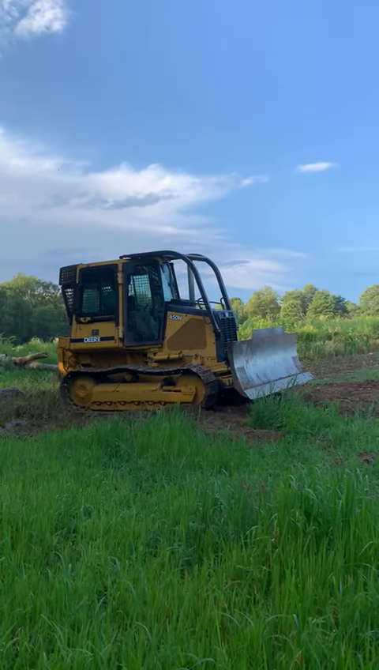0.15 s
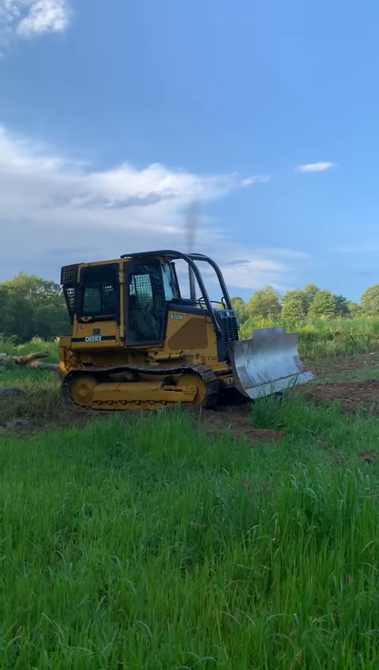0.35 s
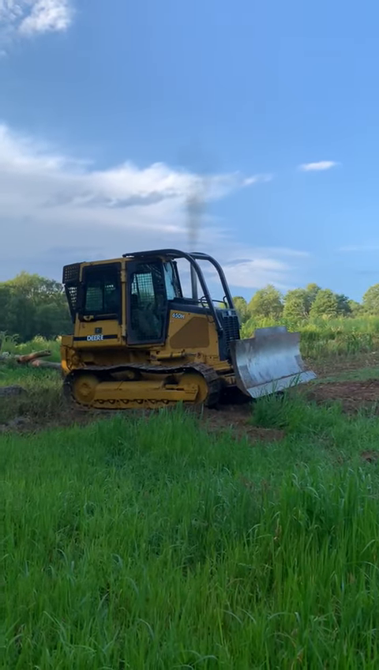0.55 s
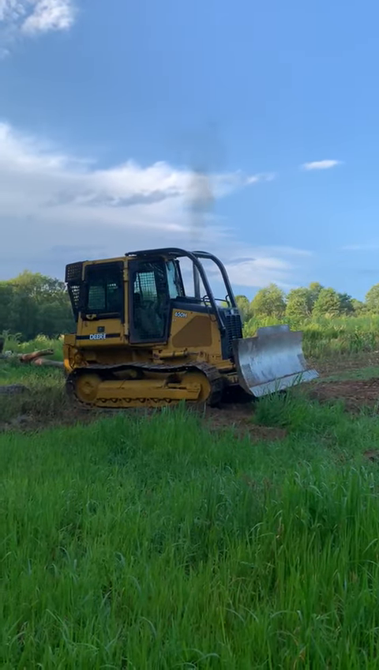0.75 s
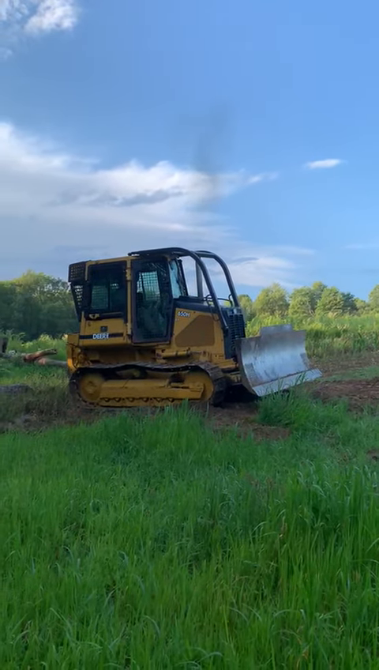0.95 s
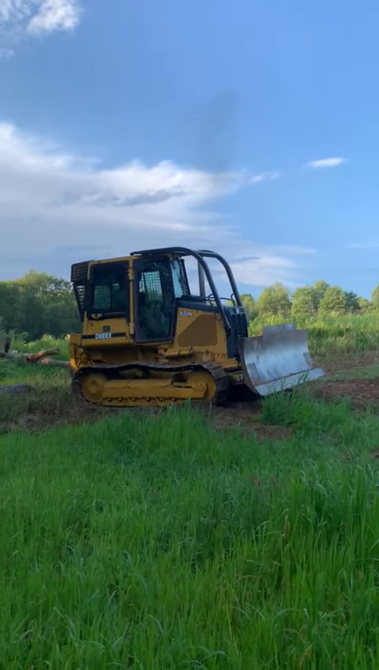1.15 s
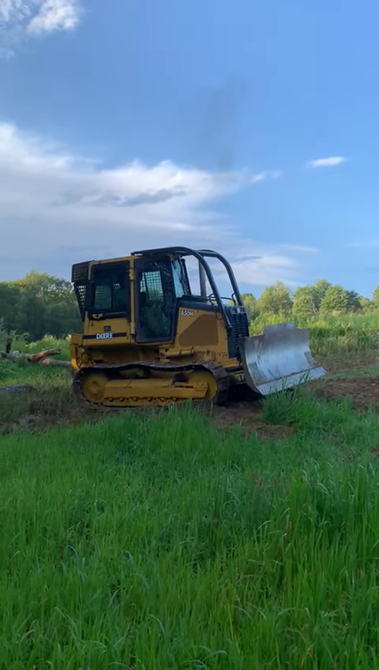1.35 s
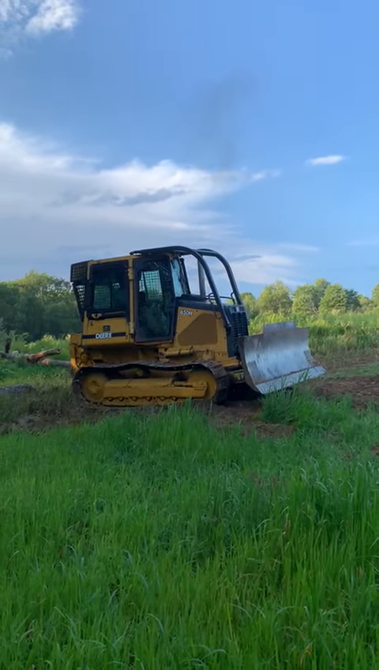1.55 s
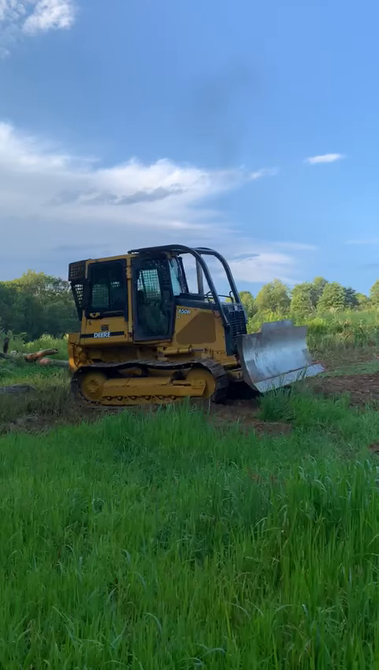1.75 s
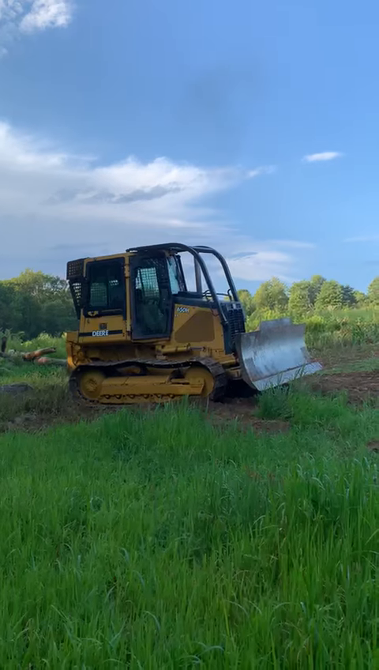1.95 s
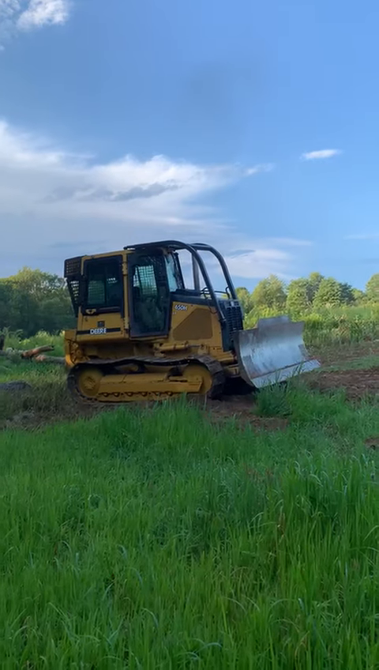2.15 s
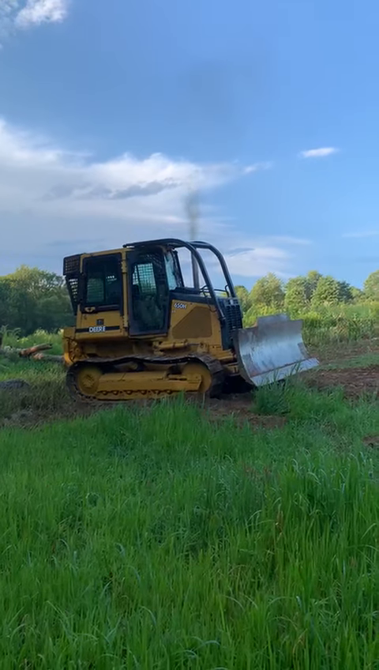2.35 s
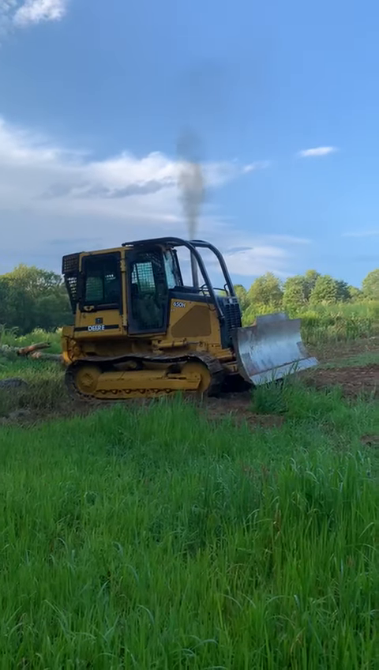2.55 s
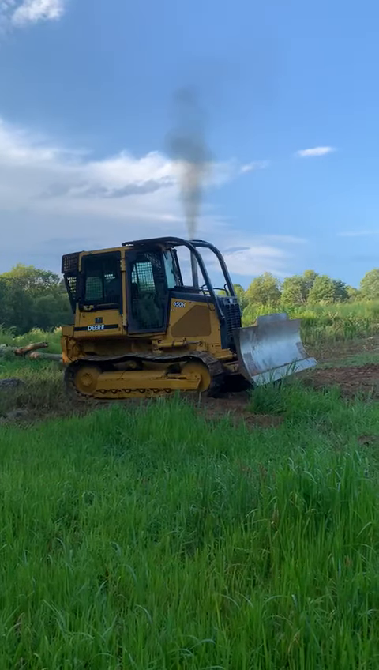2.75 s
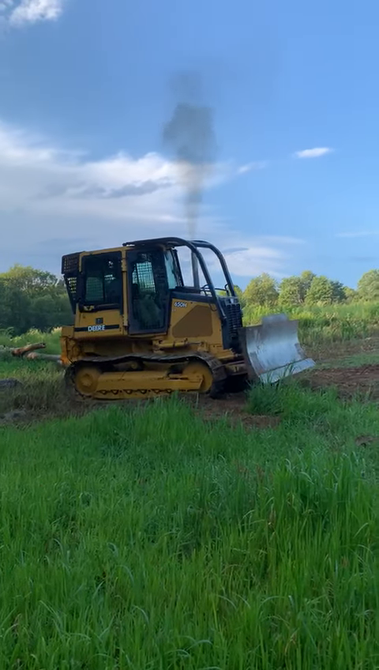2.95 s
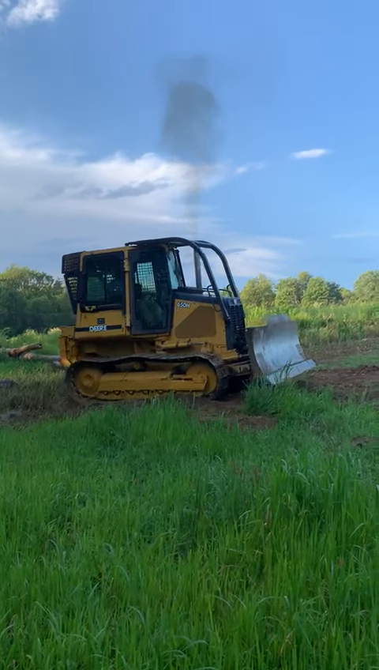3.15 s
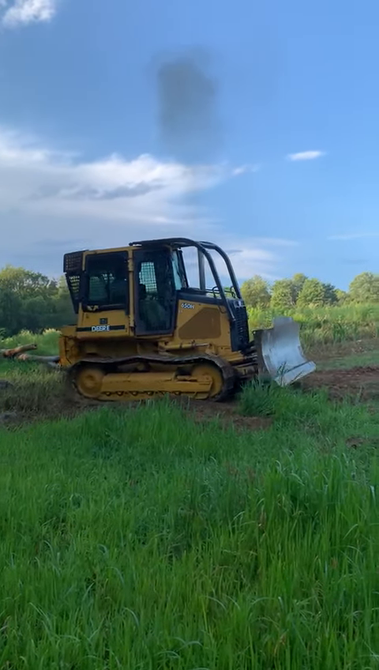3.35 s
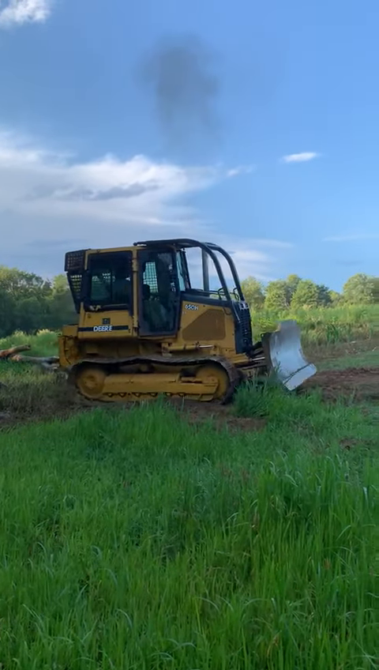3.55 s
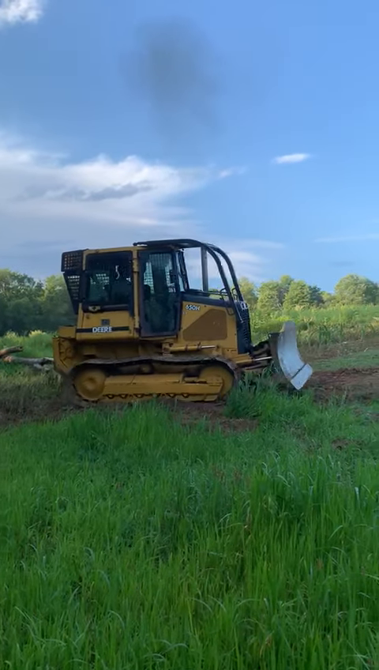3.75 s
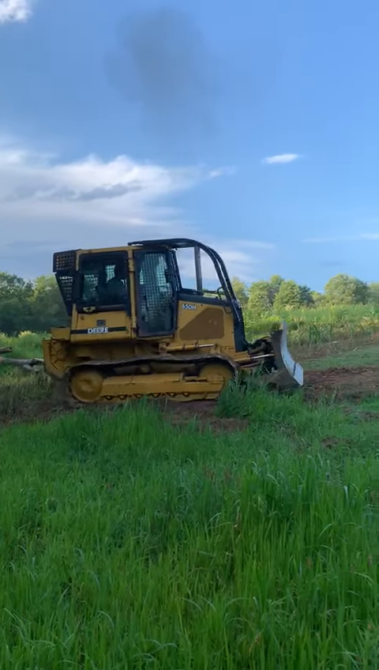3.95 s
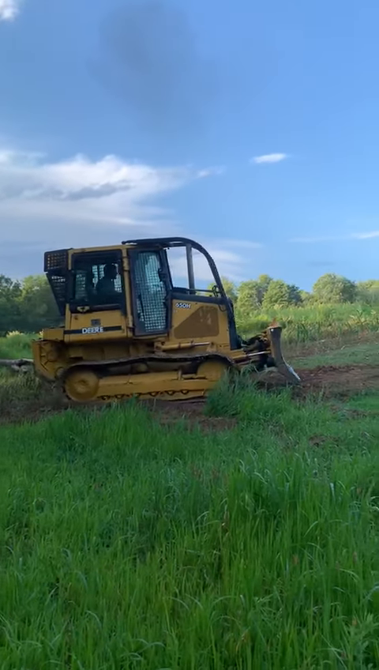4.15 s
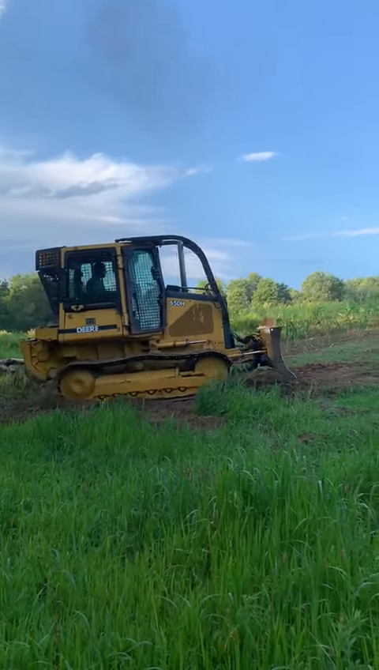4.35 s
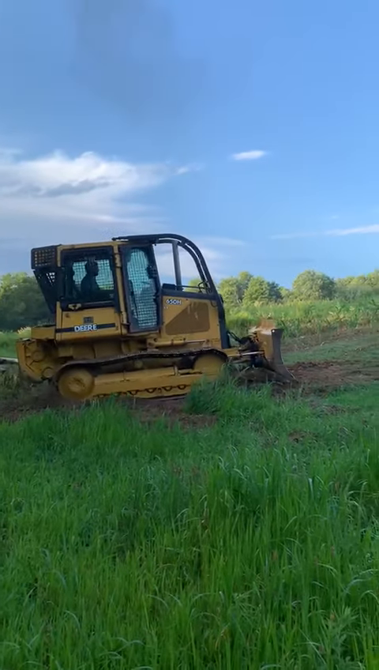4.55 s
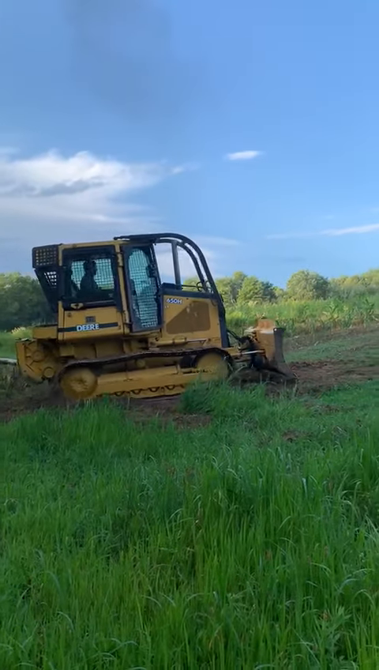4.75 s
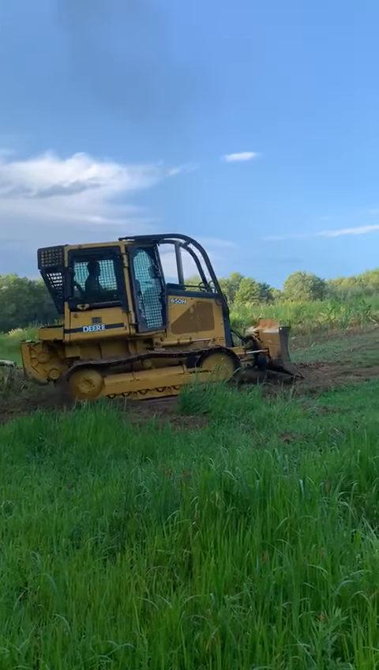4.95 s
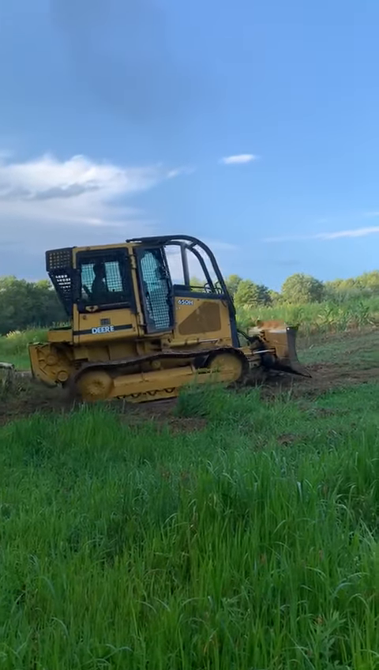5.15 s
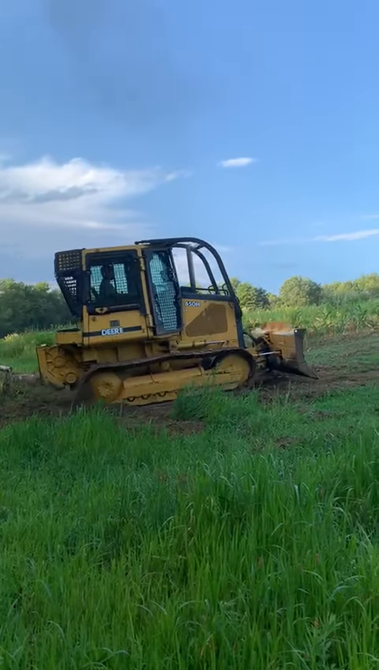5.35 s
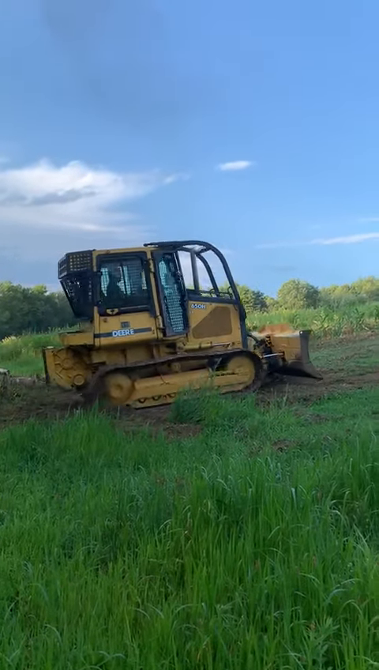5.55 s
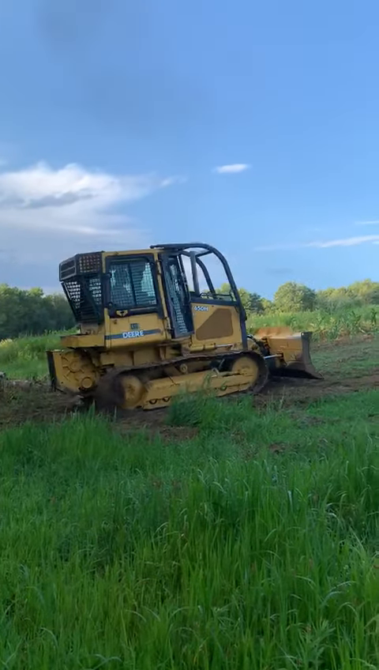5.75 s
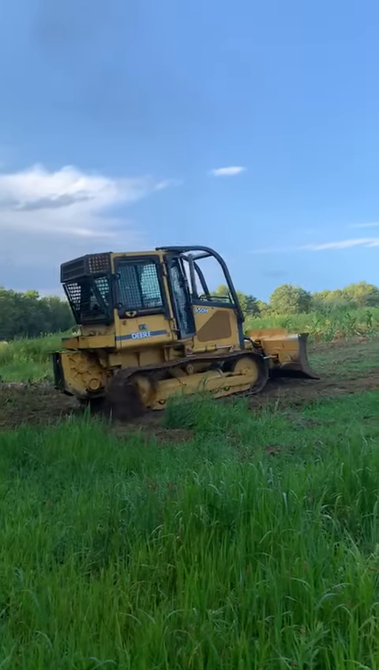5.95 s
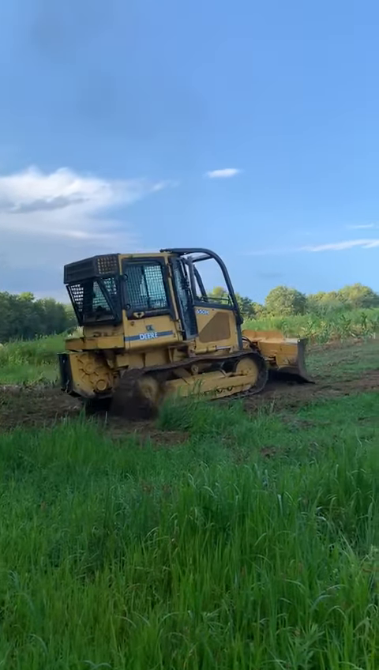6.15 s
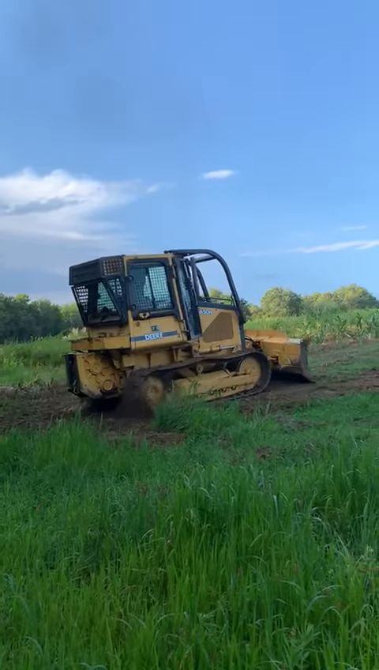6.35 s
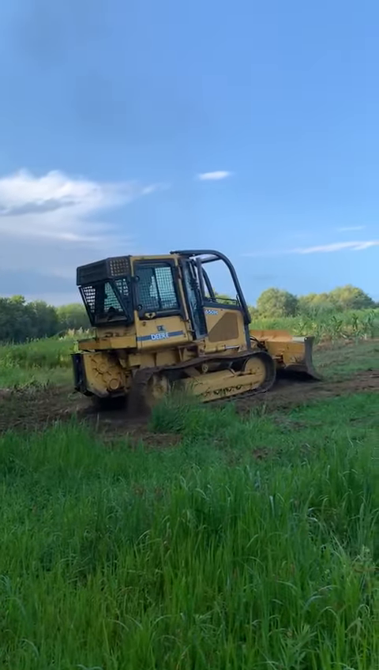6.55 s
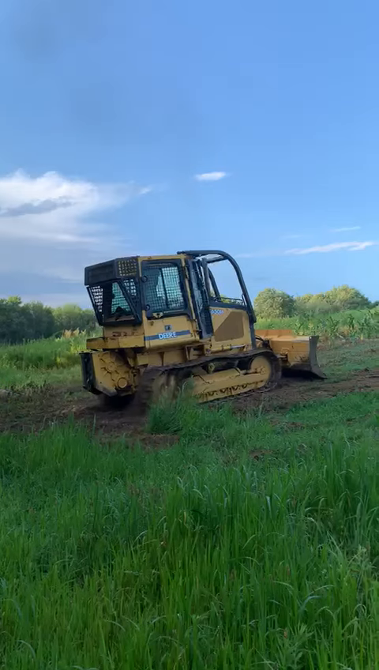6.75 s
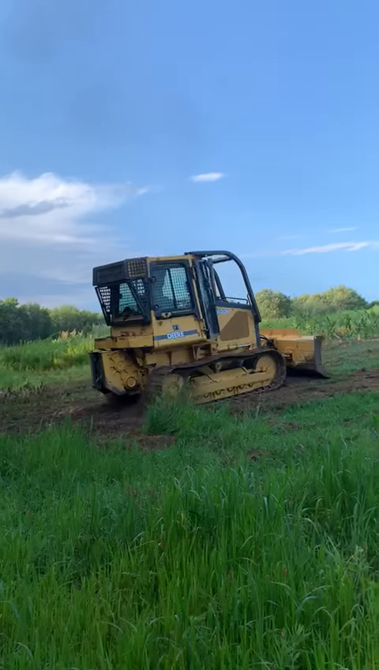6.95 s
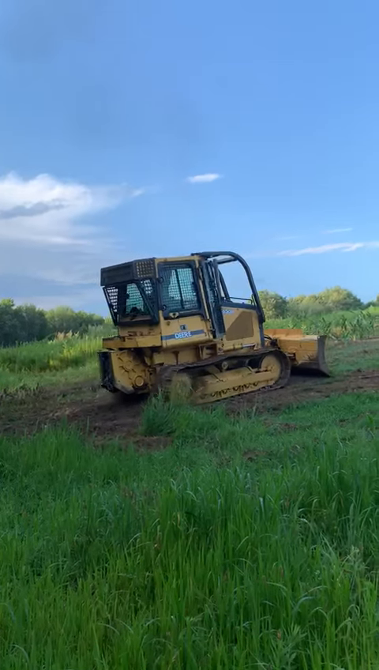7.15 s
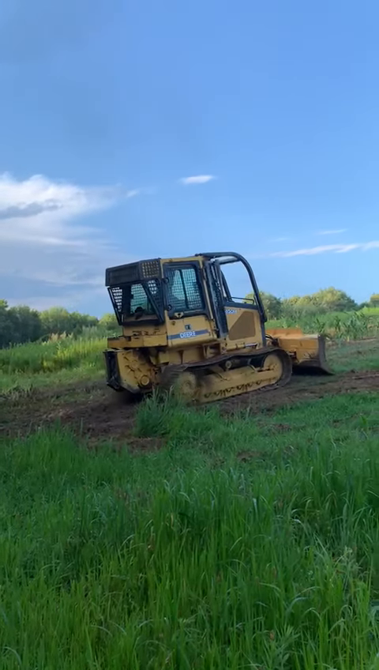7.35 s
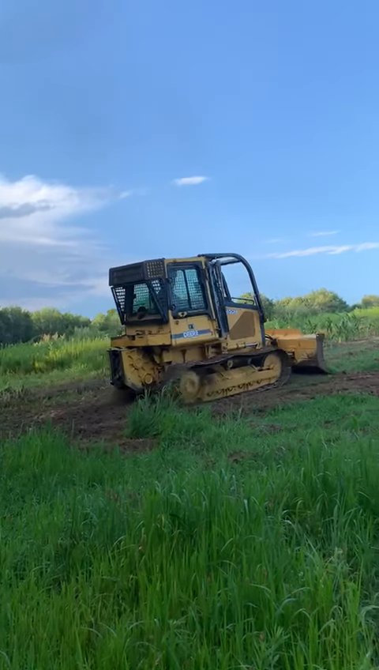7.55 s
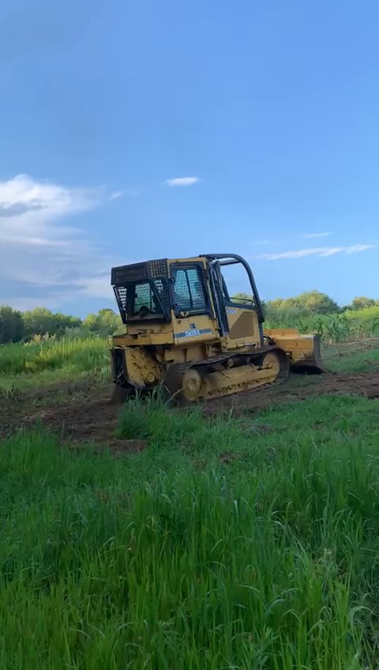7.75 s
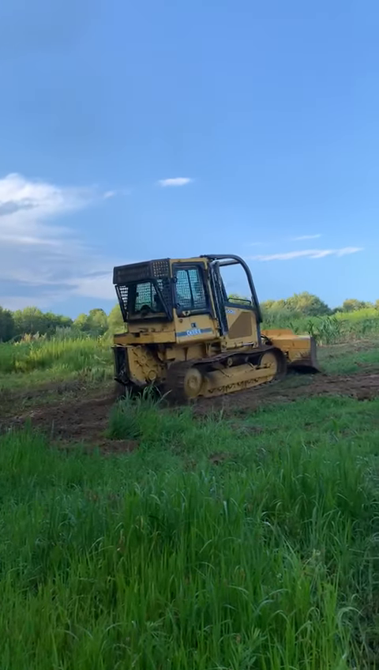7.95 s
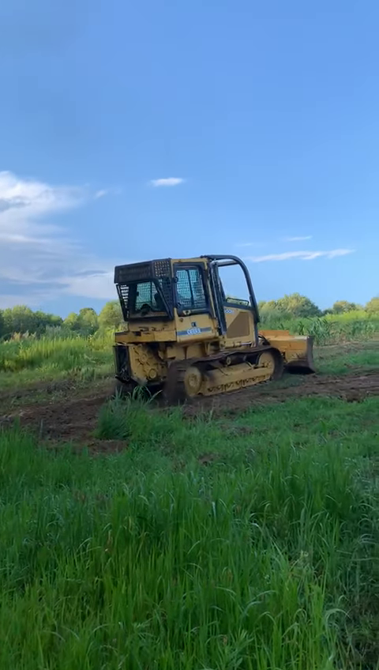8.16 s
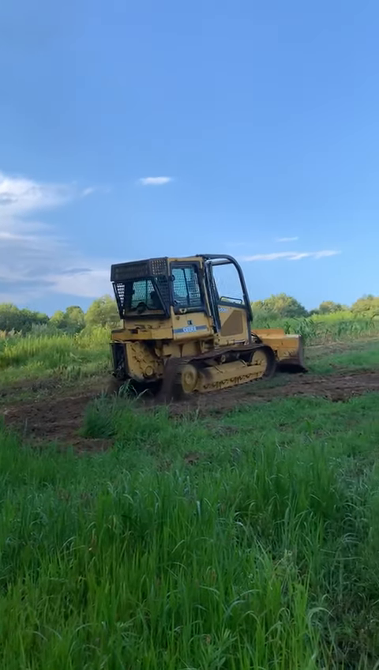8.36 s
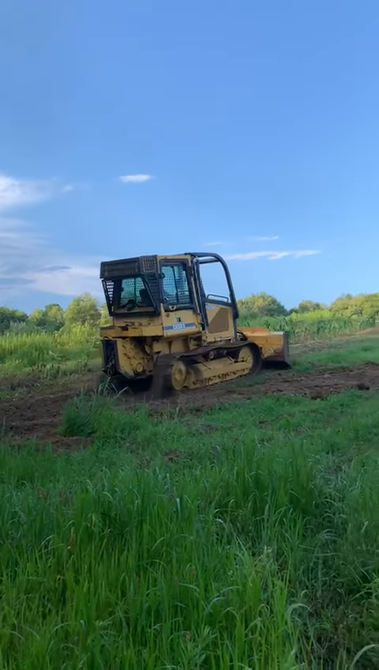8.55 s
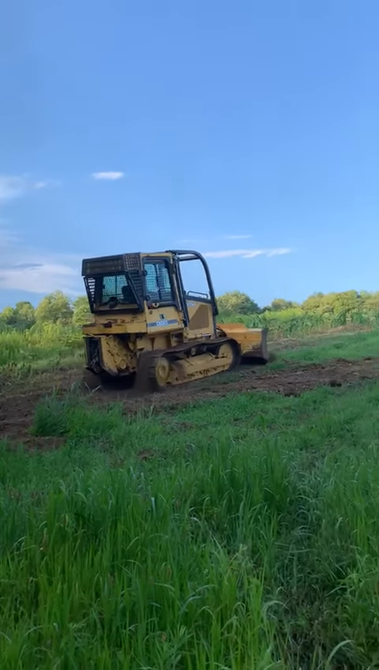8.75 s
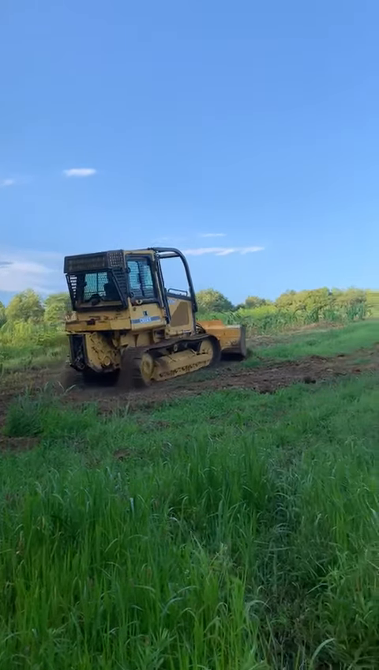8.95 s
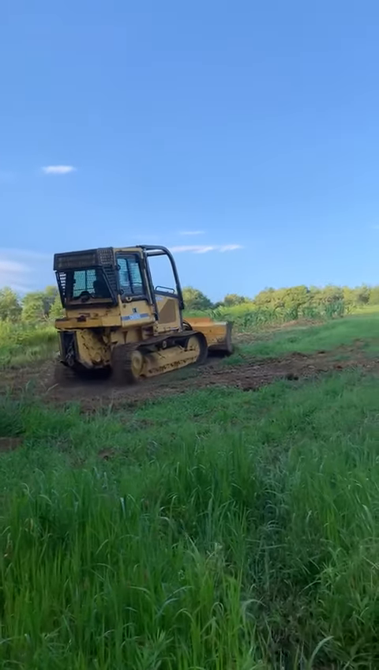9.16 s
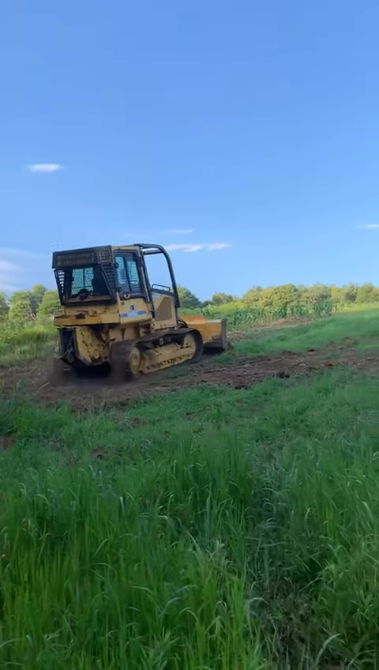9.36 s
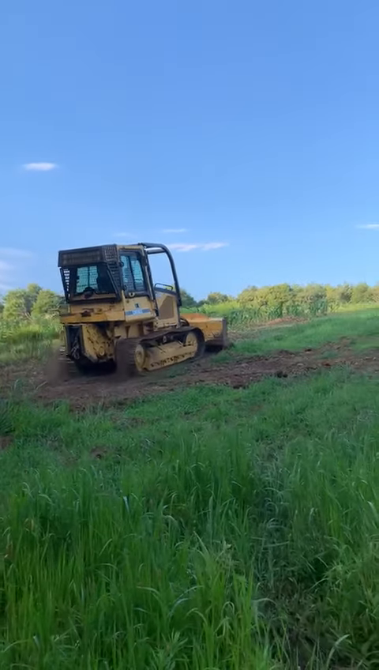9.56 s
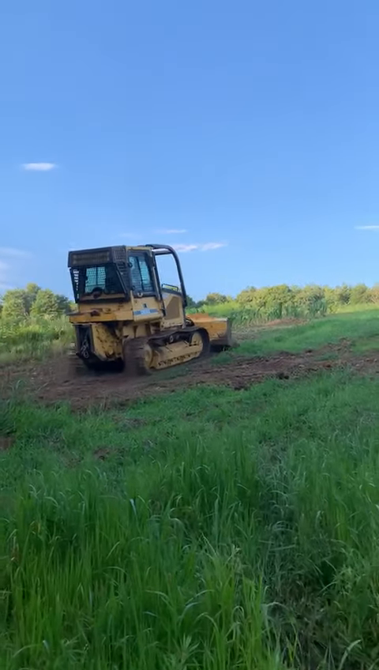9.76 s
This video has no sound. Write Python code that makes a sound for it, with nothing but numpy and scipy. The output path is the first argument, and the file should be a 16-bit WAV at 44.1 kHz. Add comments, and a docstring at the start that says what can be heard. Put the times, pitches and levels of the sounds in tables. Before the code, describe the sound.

A four-cylinder diesel crawler bulldozer stands in an open grassy field, heard from some way off on a small stereo microphone. It is blipped twice with hard knocks, sags, then revs up and holds. Tracks begin to rumble and clank, steel links grind, gears howl and dry pins squeak as it slowly turns its back and drives away.

```python
"""A four-cylinder diesel in a crawler dozer is blipped twice, then revs up and holds; it knocks as it picks up.
Its firings drive the exhaust's sines and puffs, the block's ringing knocks, an exhaust growl, hiss, rush and
whines. The dozer drives off: filtered noise rumbles, ringing shoes clank, narrow bands grind, fluttering sines
squeak. In the open field the ground adds one reflection and short noise tails scatter the sound; a small two-
port microphone hears it from some way off."""
import sys
import numpy as np
from scipy import signal
from scipy.fft import rfft, irfft, next_fast_len
from scipy.io import wavfile
from scipy.ndimage import uniform_filter1d, map_coordinates

SR = 44100
rng = np.random.default_rng(int(sys.argv[2]) if len(sys.argv) > 2 else 0)


def int16_out(signal):
    """Quantize to a 16-bit WAV file."""
    q = np.round(np.clip(np.atleast_2d(signal).T, -1, 1) * 32767)
    wavfile.write(sys.argv[1], SR, q.astype(np.int16))


N = 432621

WORKING_HZ = 66  # firings per second at working speed
TURN_S, TURN_LENGTH_S = 5.42, 5.6  # the machine gradually turns its back
KNOCK_LEAD = .1  # combustion comes this share of a firing period before the exhaust puff


def amp(db):
    """Decibels to gain."""
    return 10 ** (np.asarray(db) / 20)


def unit(x):
    """Scale to rms 1."""
    return x / np.sqrt(np.mean(x ** 2) + 1e-20)


def along(points, hz):
    """Read (frequency [Hz], value) points on a log frequency axis."""
    f, v = np.transpose(points)
    return np.interp(np.log(hz + 1), np.log(f), v)


def curves(rows):
    """One value per sample for each column after the time."""
    s, *cols = np.transpose(rows)
    return [np.interp(np.arange(N) / SR, s, c) for c in cols]


def ramp(start, length):
    """Rises from 0 to 1 and stays there."""
    return np.clip((np.arange(N) / SR - start) / length, 0, 1)


def turned_away():
    """How far the machine has turned its back, 0 to 1."""
    return ramp(TURN_S, TURN_LENGTH_S)


def wobble(rate):
    """A smooth random curve with this many knots a second."""
    knots = rng.standard_normal(int(N * rate / SR) + 4)
    fine = np.arange(0, len(knots) - 1, 1 / 10)
    return np.interp(np.arange(N) * rate / SR, fine, map_coordinates(knots, [fine]))


def lagged(x, seconds):
    """x followed with some inertia (a one-pole lag)."""
    keep = np.exp(-1 / (seconds * SR))
    return signal.lfilter([1 - keep], [1, -keep], x)


def filtered(x, response):
    """x times a complex response of frequency."""
    m = next_fast_len(N + SR // 2)
    spectrum = rfft(x, m) * response(np.fft.rfftfreq(m, 1 / SR))
    return irfft(spectrum, m)[..., :N]


def noise(spectrum):
    """Noise of rms 1 with the given colour."""
    return unit(filtered(rng.standard_normal(N), lambda hz: amp(along(spectrum, hz))))


def body(f, modes):
    """Causal response of a set of resonances with alternating signs, mean power 1."""
    h = 0
    for k, (centre, width, db) in enumerate(modes):
        damping = 1j * f * width
        h = h + (-1) ** k * amp(db) * damping / (centre * centre - f * f + damping)
    return h / np.sqrt(np.mean(abs(h) ** 2))


def ring(x, modes):
    """x through a body's resonances, keeping the power of white noise."""
    return filtered(x, lambda f: body(f, modes))


def bursts(times, sizes, t60):
    """Envelope that jumps at each time and dies away by 60 dB in t60 seconds."""
    at = np.clip(np.round(np.asarray(times) * SR).astype(int), 0, N - 1)
    return signal.lfilter([1], [1, -amp(-60 / (t60 * SR))], np.bincount(at, sizes, N))


def firings(cycles, uneven_db, scatter_db, jitter):
    """Times [s] and sizes of the firings; every second cylinder hits harder."""
    at = np.flatnonzero(np.diff(np.floor(cycles)))
    chance = rng.standard_normal((len(at), 2))
    sizes_db = scatter_db * chance[:, 1] - uneven_db * (-1) ** np.arange(len(at))
    return at / SR + jitter * chance[:, 0], amp(sizes_db)


def running(speed):
    """The engine's state: one row per term of a level law, driven by governor fuel and run-up."""
    # throttle openings: (from [s], until [s], speed asked for [firings/s])
    throttle = [(0.04, 0.46, 50), (1.22, 2, 40.7), (2.09, 9.81, 74)]
    # the governor gives full fuel this far below the speed asked for, after a short lag
    droop_hz, governor_lag_s = 10.56, 0.0034
    turbo_lag_s = 0.17  # the hard knock of a run-up lingers while the turbo catches up
    t = np.arange(N) / SR
    asked = sum(hz * ((t >= start) & (t < end)) for start, end, hz in throttle)
    fuel = lagged(np.clip((asked - speed) / droop_hz, 0, 1), governor_lag_s)
    gaining = np.maximum(np.gradient(speed) * SR, 0)
    run_up = np.maximum(gaining, fuel * lagged(gaining, turbo_lag_s))
    return np.array([np.ones(N), np.log2(speed / WORKING_HZ), fuel, run_up, turned_away()])


def overtone(angle, speed, multiple, db):
    """One exhaust overtone through the stack; high ones have rougher phase and fade at low speed."""
    # what the stack passes: (frequency [Hz], level [dB])
    stack = [(50, -8), (95, 6), (130, -3), (168, 6), (200, -7), (270, -14), (330, -9), (390, -6), (450, -9),
             (520, -7), (620, 0), (690, 1), (800, -8)]
    # each multiple above this one gains so many dB per doubling of speed
    soft_above, sharpen_db = 5, 2.6
    height = max(multiple - soft_above, 0)
    level_db = db + along(stack, multiple * speed) + sharpen_db * height * np.log2(speed / WORKING_HZ)
    rough_rad = (.22 + .17 * height) * wobble(35)
    phase = multiple * angle + rough_rad + rng.uniform(0, 2 * np.pi)
    return amp(level_db + 3 * wobble(12)) * np.sin(phase)


def exhaust(cycles, speed, state):
    """A boom at the firing rate through the muffler, overtones gliding through the stack's peaks, and puffs."""
    # level laws: (unloaded at working speed [dB], per doubling of speed [dB], full fuel [dB],
    # run-up [dB per Hz/s], turned away [dB])
    boom_law = (-22.5, 11.5, 9, 0, 1.5)
    order_law = (-45, 4.5, 3, .04, -1)
    bark_law = (-41.5, 5.5, 1.5, 0.22, 7.5)
    # what the muffler passes of the boom: (frequency [Hz], level [dB])
    muffler = [(29, -23), (36, -13), (45, -3.5), (59, 0.5), (72, -3), (84, -5), (98, 0.5), (116, -6),
               (126, -12.5), (137, -6), (146, -4.5)]
    # overtones, unequal cylinders adding the halves: (multiple of the firing rate, level [dB])
    orders = [(3, 0), (4, -2), (5, 0), (5.5, -2), (6, -2), (6.5, -3), (7, -2), (8, -4), (9, 0), (10, 0),
              (11, -2)]
    # pipe resonances: (frequency [Hz], width [Hz], level [dB])
    pipe = [(165, 18, -6.5), (213, 41, -9), (375, 19, -4), (758, 13, -6.5)]
    octave_turned_db = -13  # the boom's octave is beamed forward and fades as the machine turns

    # at low speed without fuel the boom and overtones waver
    fuel = state[2]
    lope_db = 1.2 * (1 - fuel) * (speed < WORKING_HZ * 3 / 4) * wobble(36.0)
    boom_db = np.dot(boom_law, state) + lope_db
    first_db = boom_db + along(muffler, speed)
    second_db = boom_db + along(muffler, 2 * speed) + octave_turned_db * turned_away()
    angle = 2 * np.pi * cycles
    boom = amp(first_db + 0.59 * wobble(22)) * np.sin(angle)
    boom += amp(second_db + 0.84 * wobble(14)) * np.sin(2 * angle)
    overtones = sum(overtone(angle, speed, multiple, db) for multiple, db in orders)
    overtones = amp(np.dot(order_law, state) + lope_db) * overtones

    puffs = bursts(*firings(cycles, uneven_db=1.5, scatter_db=1.3, jitter=.0001), t60=.008)
    bark = unit(ring(puffs * rng.standard_normal(N), pipe))
    return amp(np.dot(bark_law, state)) * bark + np.sqrt(2) * (overtones - boom)


def chatter(t60):
    """One blow travelling through loose parts: a short noise rattle, its spectrum evened out, energy 1."""
    t = np.arange(SR // 16) / SR
    decay = amp(-60 * t / t60) * (1 - np.exp(-t / .001))
    burst = rng.standard_normal(len(t)) * decay
    # alternately flatten the spectrum and restore the decay
    for _ in range(3):
        flat = irfft(np.exp(1j * np.angle(rfft(burst))), len(t))
        burst = flat * np.minimum(3 * decay, 1)
    return burst / np.linalg.norm(burst)


def struck(times, sizes, t60):
    """Firings that take turns among four cylinders, each with its own rattle; rms 1."""
    total = np.zeros(N)
    for k in range(4):
        blows = bursts(times[k::4], sizes[k::4], t60=1 / SR)
        total += signal.oaconvolve(blows, chatter(t60))[:N]
    return unit(total)


def knocking(cycles, state):
    """Firings knock the block over a steady valve rattle; every second one also rings a cylinder wall."""
    # level laws: (unloaded at working speed [dB], per doubling of speed [dB], full fuel [dB],
    # run-up [dB per Hz/s], turned away [dB])
    knock_law = (-39.5, 1, 5, 0.2323, 3.5)
    ring_law = (-43.5, 0, 8, 0.1675, -31)
    # knocks as the first and the last run-up begin, some hard, some lighter:
    # (time [s], strength of the blow [dB])
    run_up_knocks = [(.054, 0), (.09, -10), (.124, -4), (.186, 0), (.244, -.5), (.295, 2.5), (2.096, 6),
                     (2.127, 3), (2.241, -1), (2.29, 1)]
    # resonances of block and wall: (frequency [Hz], width [Hz], level [dB])
    block = [(617, 137, -8.5), (1030, 75, 0.5), (1350, 77, 3), (1612, 130, -4), (1980, 184, -7.5),
             (2565, 130, -10), (3440, 1700, -25)]
    cylinder_wall = [(1307, 70, 1), (1390, 94, 5), (1600, 300, -11.5)]
    knock_t60_s = .036  # a run-up knock; ordinary firings rattle twice as long

    rattle_db, ring_db = np.dot([knock_law, ring_law], state)
    times, sizes = firings(cycles + KNOCK_LEAD, uneven_db=.5, scatter_db=1.3, jitter=.0006)
    valve_rattle = rng.standard_normal(N)
    blows = .8 * struck(times, sizes, t60=2 * knock_t60_s) + .6 * valve_rattle
    s, db = np.transpose(run_up_knocks)
    extra_blows = signal.oaconvolve(bursts(s, amp(db), t60=1 / SR), chatter(knock_t60_s))[:N]
    slaps = unit(bursts(times[1::2], sizes[1::2], t60=1 / SR))
    return ring(amp(rattle_db) * blows + extra_blows, block) + ring(amp(ring_db) * slaps, cylinder_wall)


def injector_hiss(cycles, hiss_db):
    """Injectors spray noise that swells with each firing; a few thin bright ticks share its colour."""
    # thin bright ticks: (time [s], level [dB])
    ticks = [(5.381, -25), (5.536, -23)]
    # spectrum: (frequency [Hz], level [dB per Hz])
    hiss_colour = [(2000, -37), (4200, -100), (5700, 5), (7000, 1), (8400, 8), (9500, 2), (11000, -16),
                   (12000, -1)]
    times, sizes = firings(cycles + KNOCK_LEAD, uneven_db=0.5, scatter_db=3.5, jitter=.0009)
    pulses = uniform_filter1d(bursts(times, sizes, t60=.1), size=130)  # soften the onsets
    spray = unit(pulses + .5)
    s, db = np.transpose(ticks)
    envelope = amp(hiss_db + 0.65 * wobble(25)) * spray + bursts(s, amp(db), t60=0.051)
    return envelope * noise(hiss_colour)


def gear_rush(cycles, rush_db):
    """Fan and gears rush: steady noise plus a noise pattern repeated on every turn of the crankshaft."""
    # spectrum: (frequency [Hz], level [dB per Hz])
    rush_colour = [(25, -16), (50, 7.5), (190, 11.5), (300, -4.5), (450, -7), (620, 0.5), (820, -4.5),
                   (1100, -2.5), (1550, -5), (2100, -12), (2600, -14), (2900, -21), (4400, -18),
                   (6500, -80), (11000, -27)]
    mesh_above_hz = 220
    # the same teeth meet on every turn, two firings long
    teeth = rng.standard_normal(size=1300)
    meshing = unit(np.interp(cycles / 2 % 1, np.linspace(0, 1, len(teeth)), teeth))
    gears = filtered(meshing, lambda hz: hz ** 4 / (hz ** 4 + mesh_above_hz ** 4))
    gears = gears + rng.standard_normal(N)
    churn_db = .6 * wobble(25)
    return amp(rush_db + churn_db) * unit(filtered(gears, lambda hz: amp(along(rush_colour, hz))))


def engine(cycles, state):
    """Returns the combustion knocks with injector hiss, and the rush of fan and gears."""
    # level laws: (unloaded at working speed [dB], per doubling of speed [dB], full fuel [dB],
    # run-up [dB per Hz/s], turned away [dB])
    rush_law = (-25.5, 9, 2.5, 0.008, -4.5)
    hiss_law = (-39.5, 7.8, 2.8, .13, -7)
    rush_db, hiss_db = np.dot([rush_law, hiss_law], state)
    combustion = knocking(cycles, state) + injector_hiss(cycles, hiss_db)
    return combustion, gear_rush(cycles, rush_db)


def growl(cycles, state):
    """Uneven exhaust puffs sound two pipe resonances, more as the engine labours up to speed."""
    # level law: (unloaded at working speed [dB], per doubling of speed [dB], full fuel [dB],
    # run-up [dB per Hz/s], turned away [dB])
    growl_law = (-47.5, 11, 4, .33, 2)
    # pipe resonances: (frequency [Hz], width [Hz], level [dB])
    pipe_modes = [(390, 70, 0), (640, 110, -5)]
    gulps = bursts(*firings(cycles, uneven_db=1.5, scatter_db=2, jitter=.00015), t60=1 / SR)
    return amp(np.dot(growl_law, state)) * unit(ring(gulps, pipe_modes))


def whines(cycles, speed):
    """Fan, pump and gear tones follow the crankshaft and grow with speed; some howl in swells under strain."""
    # fan blade, pump and timing gear tones:
    # (multiple of the firing rate, level at full speed [dB], change once turned away [dB])
    tones = [(2.48, -34, -4), (9, -40, 3), (10.2, -37, -2), (16, -41, 0)]
    # gears and pump howl while strained:
    # (time at the height [s], length [s], multiple of the firing rate, level [dB])
    howls = [(5.5, 3.6, 2.48, -29.5), (5.6, 0.73, 3.62, -26.5), (6.39, 0.28, 3.62, -29),
             (7.25, 1.1, 9, -28.5), (3.1, .5, 9, -34), (3.3, .7, 10, -34), (8.15, .4, 10, -31)]

    def tone(multiple):
        """A wavering sine of rms 1."""
        phase = 2 * np.pi * multiple * cycles + .4 * wobble(20)
        return unit(amp(2.5 * wobble(12)) * np.sin(phase))

    loaded = np.zeros(N)
    for s, length, multiple, db in howls:
        swell = np.sin(np.pi * ramp(s - length / 2, length))
        loaded += amp(db) * swell * tone(multiple)
    turned = turned_away()
    steady = sum(amp(db + turned_db * turned) * tone(multiple) for multiple, db, turned_db in tones)
    return loaded + (speed / speed.max()) ** 3 * steady


def tracks():
    """Rollers rumble as the travel picks up; shoes clank on the sprocket over a steady small clatter."""
    # track shoes hitting the sprocket: (time [s], relative strength [dB])
    clank_times = [(3.345, -14), (3.5458, -10.5), (3.70, -13), (3.7354, -9), (4.083, -10.5), (5.537, -13),
                   (5.697, -14), (5.8561, -10), (5.9994, -11), (6.173, -10), (6.323, -13), (6.5014, -11),
                   (6.6772, -10), (7.327, -14), (7.57, -14), (7.763, -11.5), (8.533, -13), (9.208, -12),
                   (9.486, -14), (9.75, -13)]
    # rumble spectrum: (frequency [Hz], level [dB per Hz])
    rumble_colour = [(25, -35), (80, -27), (115, -4), (190, 3.5), (280, 5.5), (450, -11), (650, -1.5),
                     (900, -15), (2000, -12.5), (5000, -90)]
    # shoe resonances: (frequency [Hz], width [Hz], level [dB])
    shoe = [(675, 306, 4.5), (1038, 80, 8.5), (1276, 51, 12.5), (1510, 185, 4.5), (1920, 307, 1),
            (4410, 315, -10)]
    move_off_s, pickup_s = 2.6, 0.59
    rumble_start_s, rumble_rise_s = 2.55, 1.44  # the rumble builds more slowly than the clatter
    rumble_db, turned_db = -23.5, -2
    clatter_db, clank_db = -5, -11  # clatter relative to the rolling level
    bounce_s, bounce_db = .016, -6  # each shoe rebounds once

    rolling = ramp(move_off_s, pickup_s) * amp(rumble_db + turned_db * turned_away())
    rumble = rolling * ramp(rumble_start_s, rumble_rise_s) * amp(1.8 * wobble(11)) * noise(rumble_colour)
    chance = rng.random((3500, 2))
    hits = unit(bursts(chance[:, 0] * N / SR, amp(-12 * chance[:, 1]), t60=0.057))
    clatter = hits * rolling * amp(clatter_db)
    s, db = np.transpose(clank_times)
    strengths = amp(np.r_[db, db + bounce_db] + clank_db)
    clanks = bursts(np.r_[s, s + bounce_s], strengths, t60=.085)
    return rumble + ring((clatter + clanks) * rng.standard_normal(N), shoe)


def steel_bands():
    """Swells of narrow, rough ringing: links rub along their guides, and one is the cylinder wall under load."""
    # the first swell is the cylinder wall's knock ringing on under load, the others are links grinding:
    # (time at the height [s], length [s], pitch [Hz], level [dB])
    swells = [(3.332, 0.99, 1307, -32), (5.15, 1.1, 1474, -29.5), (5.452, 1.7, 1628, -34.5),
              (5.6, 1.3, 1113, -30), (6.077, 0.95, 1545, -32.5), (6.666, 0.16, 1567, -34),
              (7.2, 2.4, 1083, -31.5), (7.593, 0.26, 1525, -28), (8.466, 0.32, 1282, -28.5),
              (9.246, 1.56, 1996, -36.5)]
    width_hz = 85
    t = np.arange(N) / SR
    rub = unit(abs(wobble(22)) + 2) * (wobble(width_hz) + 1j * wobble(width_hz))
    out = np.zeros(N)
    for s, length, hz, db in swells:
        on = np.flatnonzero(abs(t - s) < length / 2)
        shape = np.cos(np.pi * (t[on] - s) / length)
        rough = rub[(on + rng.integers(N)) % N]  # each swell reads the roughness from a random place
        out[on] += amp(db) * shape * (rough * np.exp(2j * np.pi * hz * t[on])).real
    return out


def squeaks():
    """A dry pin sticks and slips in its bushing: a fluttering, slightly unsteady whistle."""
    # dry track pins: (start [s], length of the bite [s], level [dB], centre pitch [Hz])
    pins = [(3.418, .065, -19.5, 7640), (7.11, .06, -33, 7880), (7.18, .09, -28, 7800),
            (7.33, .05, -32, 7930), (7.54, .1, -33, 8290), (7.63, .14, -35.5, 8230), (7.67, .06, -35, 4870),
            (7.74, .12, -37, 5000), (7.751, .12, -26, 7785), (7.9, .13, -36, 5060), (8.0, .28, -38, 7780),
            (8.43, .05, -34, 7750), (8.52, .13, -29, 7780), (8.68, .1, -36, 7630),
            (9.077, .19, -35.5, 6690), (9.52, .17, -34, 5020)]
    # each squeak bites, then sings on more weakly while the pin comes to rest
    sing_db, sing_s = -12, .12
    flutter = amp(3.5 * wobble(70) - 1)
    drift = .005 * wobble(250) + .002 * wobble(20)
    clock = np.cumsum(1 + drift) / SR

    def swell(s, length):
        """Rises a little faster than it falls."""
        return abs(np.sin(np.pi * ramp(s, length) ** .66))

    out = np.zeros(N)
    for s, length, db, hz in pins:
        shape = swell(s, length) + amp(sing_db) * swell(s, length + sing_s)
        out += amp(db) * shape * np.sin(2 * np.pi * hz * clock)
    return np.sqrt(2) * flutter * out


def patchy(x, depth_db):
    """Narrow bands of x swell and sink on their own, so the roar wavers."""
    z = signal.stft(x, nperseg=1024)[2]
    field = uniform_filter1d(rng.standard_normal(z.shape), size=3, axis=0)  # across frequency
    field = uniform_filter1d(field, size=7, axis=1)  # across time
    wavering = signal.istft(z * amp(depth_db * unit(field)), nperseg=1024)[1][:N]
    return unit(wavering) * x.std()


def ground(x, share):
    """One reflection whose delay drifts as the machine moves, so its comb of peaks slides."""
    # delay of the reflection: (time [s], delay [s])
    delays = [(5.3, 0.0018), (6.4, 0.00198), (6.9, 0.00187), (7.6, 0.00193), (8.3, 0.00194), (9.4, 0.0021)]
    delay, = curves(delays)
    n = np.arange(N)
    reflection = np.interp(n - delay * SR, n, x)
    return (x + share * reflection) / np.hypot(1, share)


def scattering(far_side):
    """The field scatters the far side's noise: a short decaying noise tail, independent at each port."""
    # scattered sound: (frequency [Hz], level [dB])
    scatter = [(70, -28), (250, -12), (520, -7), (1600, -9), (2500, 0), (4300, -3), (5300, -14), (6400, -5),
               (7600, -14)]
    t = np.arange(SR // 6) / SR
    tail = rng.standard_normal((2, len(t))) * amp(-60 * t / 0.1)
    scattered = signal.fftconvolve(far_side[None], tail / np.linalg.norm(tail[0]), axes=1)[:, :N]
    return filtered(scattered, lambda hz: amp(along(scatter, hz)))


def scene():
    """The machine as both ports hear it: direct sound with a phase lead between ports, plus scattering."""
    # engine speed: (time [s], speed [firings/s])
    firing_rate = [(0.0, 26.86), (0.07, 27.56), (0.36, 42.27), (0.52, 45.05), (1.2, 29.46), (1.56, 36.07),
                   (2.1, 32.14), (2.78, 61.42), (3.15, 70.71), (3.5, 71.94), (4.25, 64.11), (5.0, 67.73),
                   (5.72, 65.44), (6.02, 66.88), (6.47, 63.23), (6.98, 68.79), (8.3, 66.39), (9.8, 67.63)]
    # phase between the ports: (frequency [Hz], left lead [rad])
    left_lead = [(70, -.04), (250, -.2), (450, -1.1), (600, .7), (800, -.2), (920, 1.4), (1250, .2),
                 (2250, .4), (2550, 2.1), (4100, 1.1), (4900, 2.5), (5900, 3.3), (7000, 6.2), (10000, 6.3),
                 (11000, 9)]
    speed, = curves(firing_rate)
    cycles = np.cumsum(speed) / SR + .5  # counts firings
    state = running(speed)
    combustion, rush = engine(cycles, state)
    roar = ground(patchy(rush + tracks(), depth_db=2.1), share=0.42)
    direct = exhaust(cycles, speed, state) + growl(cycles, state) + combustion
    direct = direct + whines(cycles, speed) + roar + steel_bands() + squeaks()
    # the far side's noise is drawn afresh
    far_side = sum(engine(cycles, state)) + tracks()
    ports = filtered(direct, lambda hz: np.exp(.5j * np.outer([1, -1], along(left_lead, hz))))
    return ports + scattering(far_side)


def record(dry):
    """The ports differ in colour; nothing passes above the band limit."""
    # colour of the ports: (frequency [Hz], left minus right [dB])
    balance = [(70, 0), (410, -3), (520, -16), (780, -6), (950, -7), (1250, -1), (1750, -1), (1950, -5),
               (2600, -7), (3400, 0)]
    top_hz = 11200

    def ports(hz):
        """Gain of each port, mean power 1 at every frequency below the limit."""
        gain = amp(np.outer([.5, -.5], along(balance, hz)))
        return gain / np.sqrt(np.mean(gain ** 2, 0)) * (hz < top_hz)

    return filtered(dry, ports)


dry = scene()
out = record(dry)
int16_out(out)
```